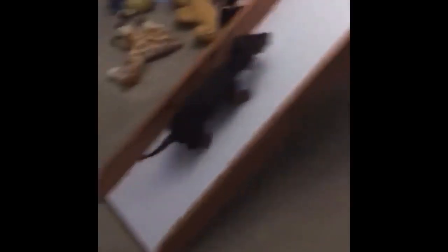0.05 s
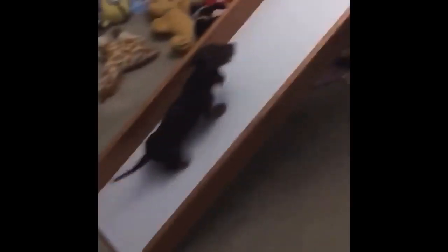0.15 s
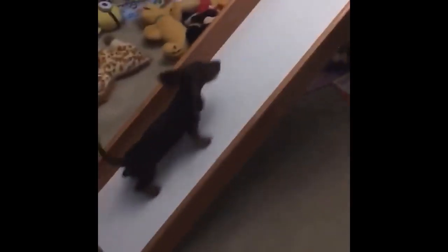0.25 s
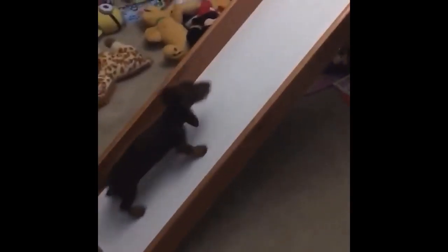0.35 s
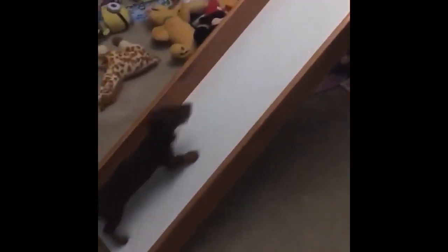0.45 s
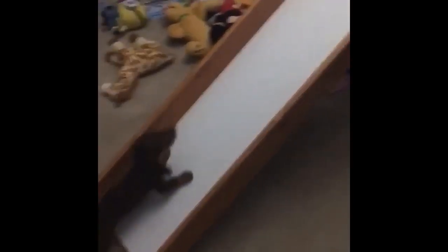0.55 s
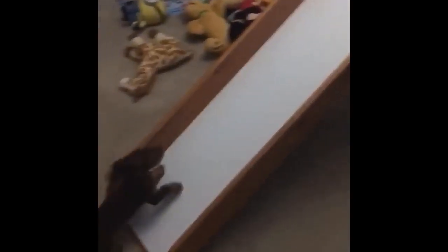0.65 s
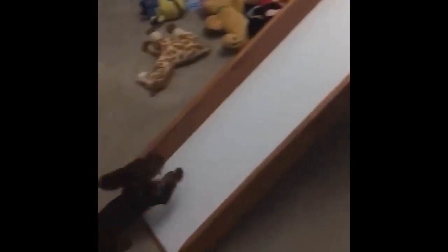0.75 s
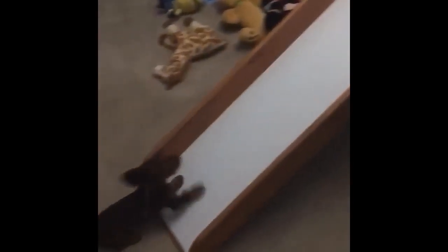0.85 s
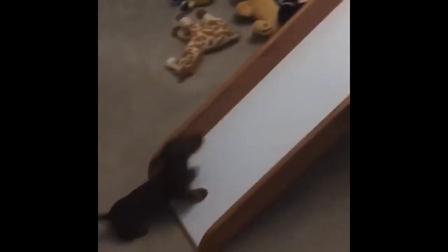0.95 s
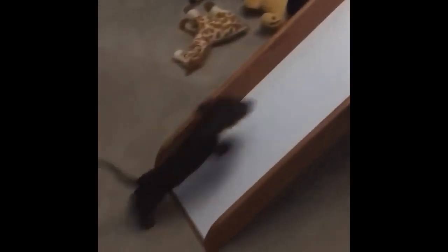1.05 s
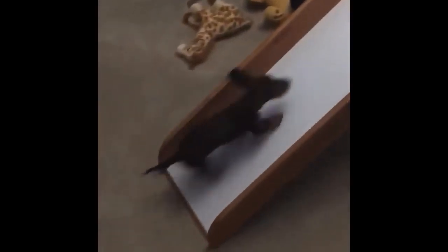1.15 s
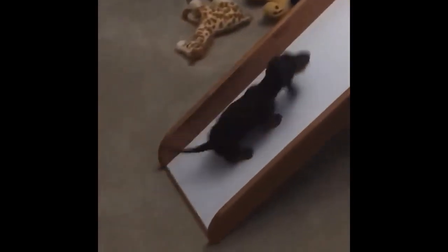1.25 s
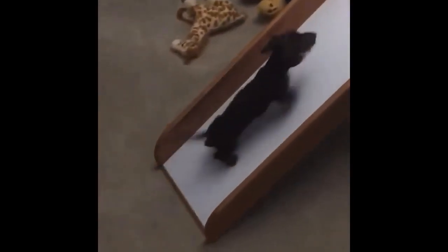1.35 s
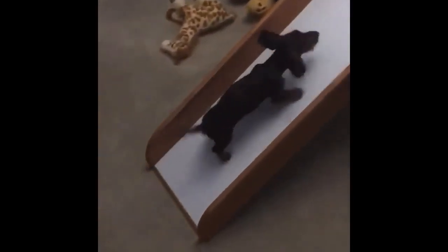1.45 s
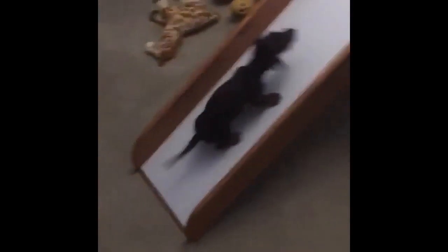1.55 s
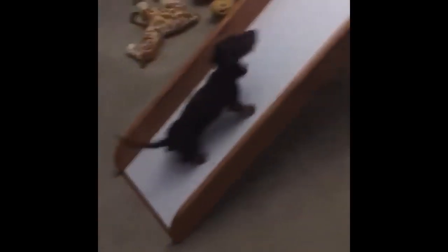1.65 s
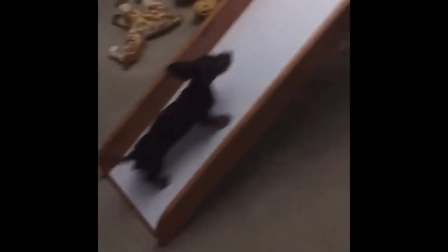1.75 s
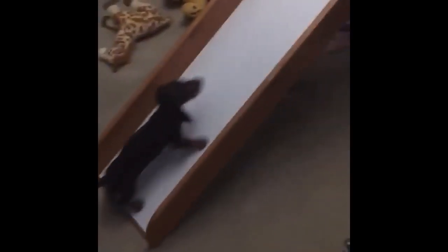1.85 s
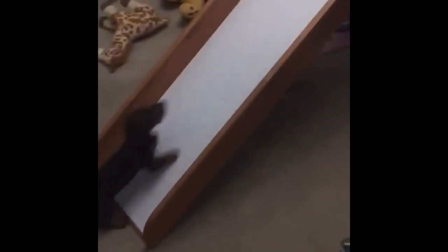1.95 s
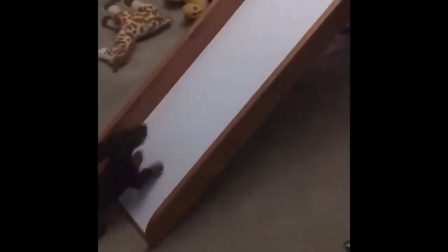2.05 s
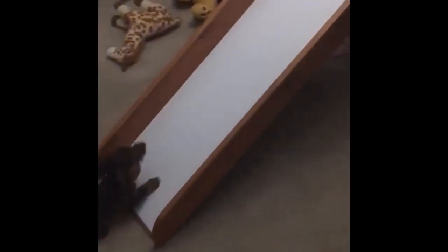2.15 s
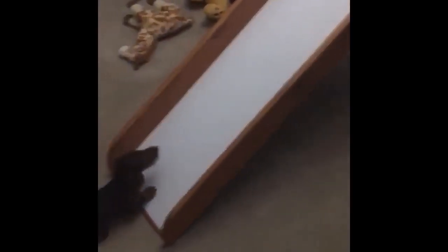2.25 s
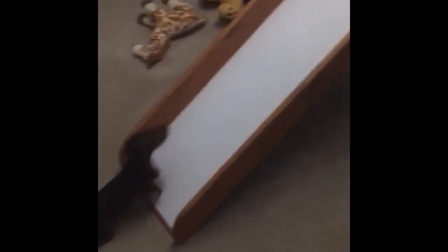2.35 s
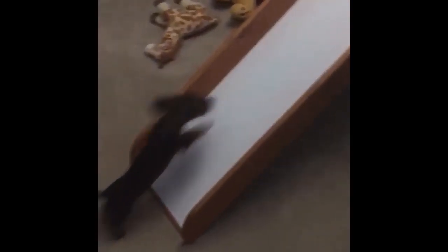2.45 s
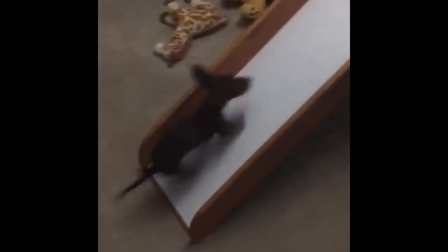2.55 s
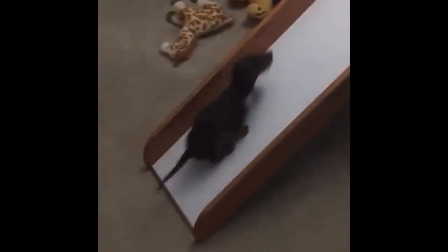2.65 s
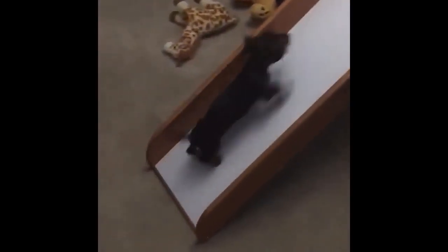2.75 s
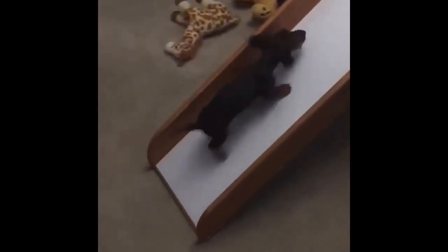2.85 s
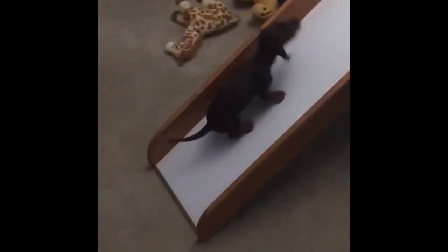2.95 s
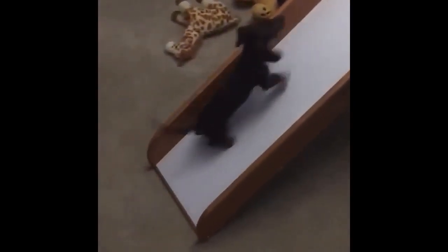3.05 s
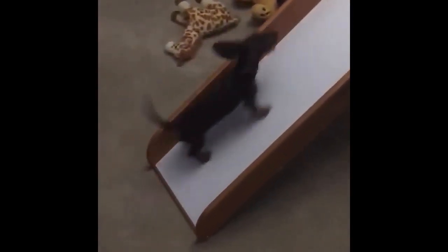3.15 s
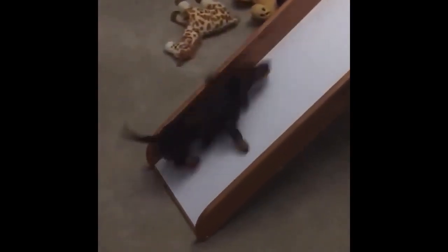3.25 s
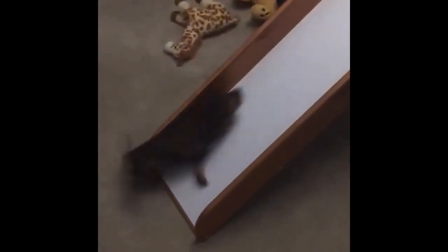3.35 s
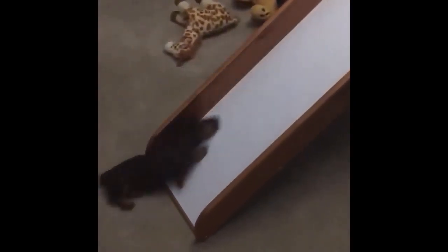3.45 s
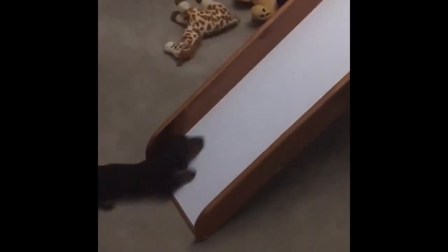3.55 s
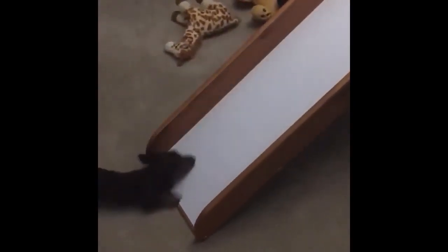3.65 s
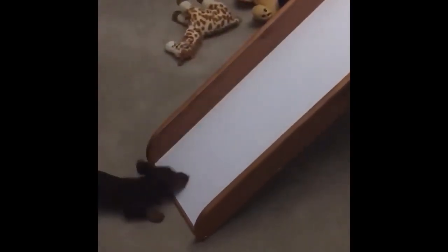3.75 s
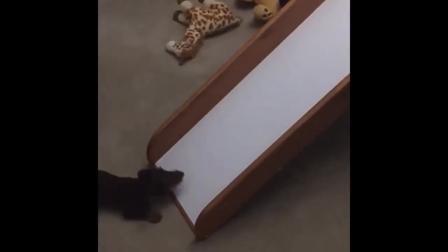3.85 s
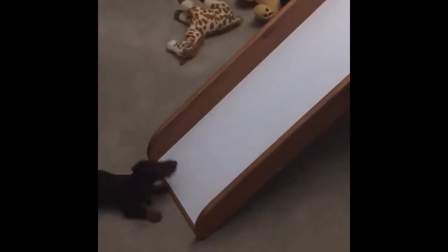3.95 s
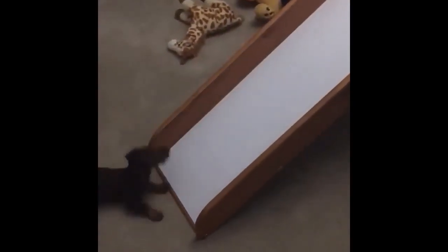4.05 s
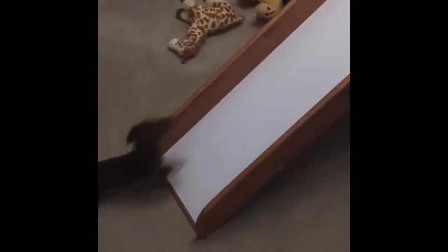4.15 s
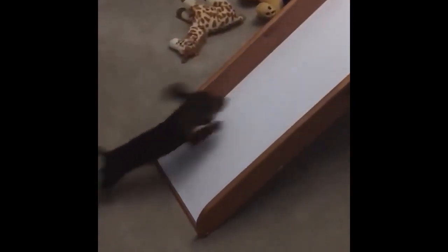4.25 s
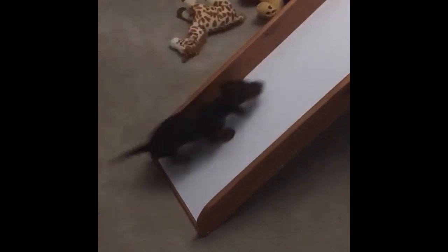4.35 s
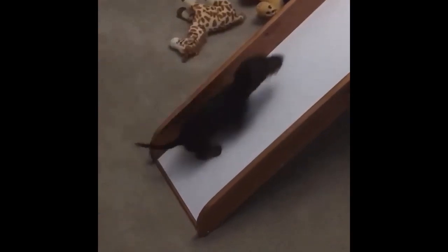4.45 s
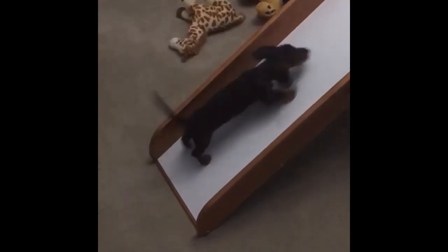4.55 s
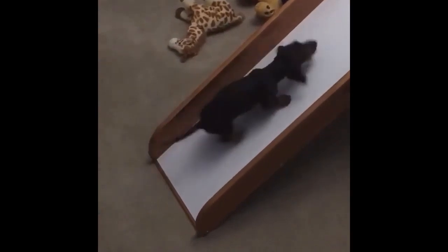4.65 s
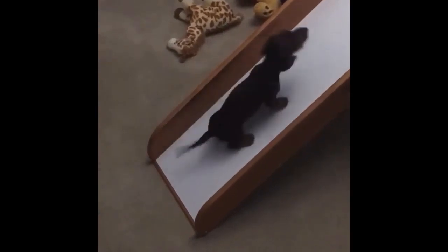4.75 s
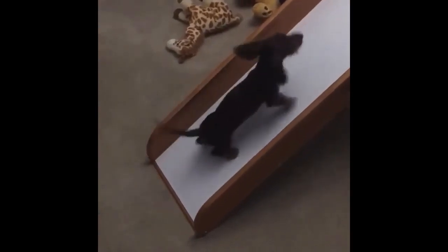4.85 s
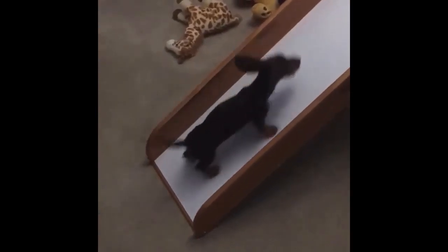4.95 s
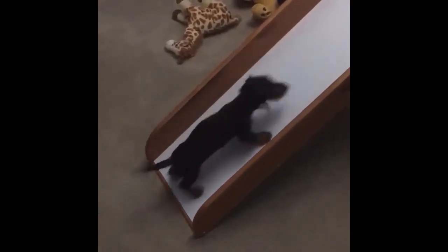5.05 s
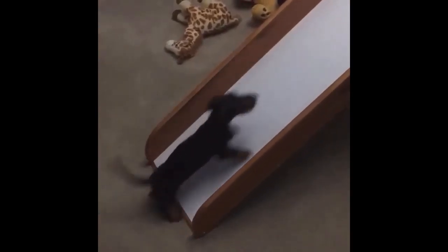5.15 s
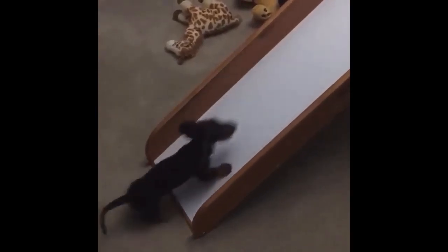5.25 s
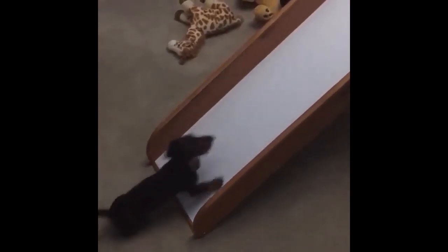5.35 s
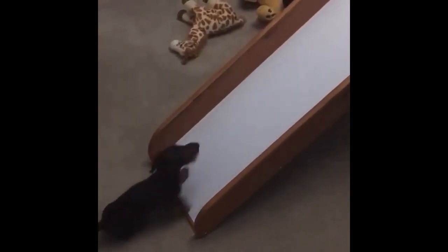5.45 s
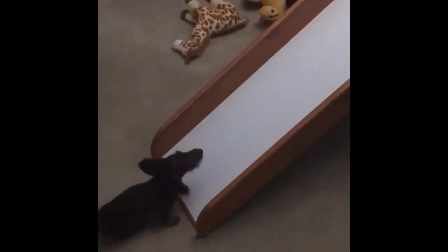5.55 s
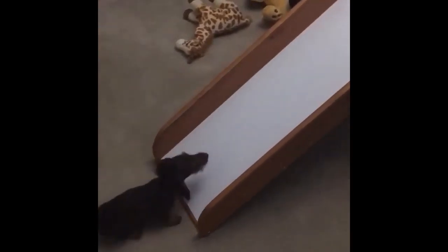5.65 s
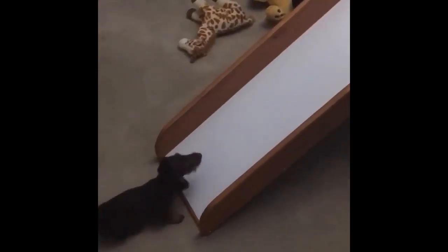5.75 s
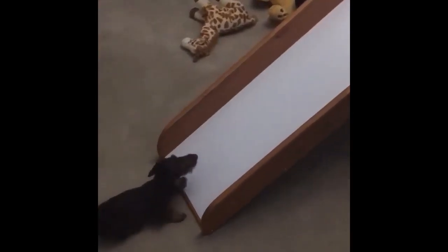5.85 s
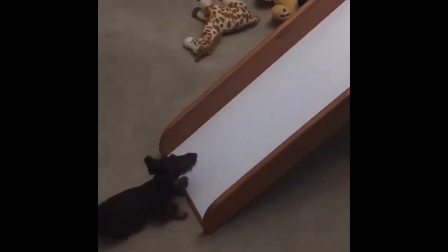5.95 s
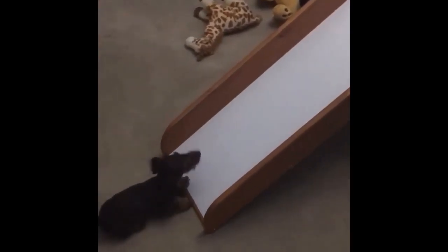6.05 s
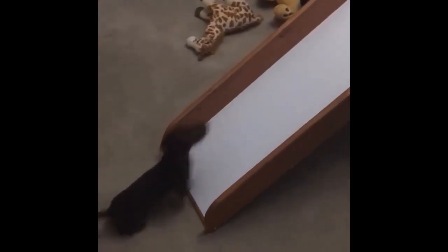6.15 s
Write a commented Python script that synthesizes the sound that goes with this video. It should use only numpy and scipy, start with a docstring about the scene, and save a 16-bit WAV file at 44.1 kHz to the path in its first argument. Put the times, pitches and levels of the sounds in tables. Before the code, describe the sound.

A puppy struggles on a small wooden slide in a quiet carpeted room, heard by one microphone. From 0 to 0.4 s paws thud and claws snap, then gritty fur-and-pad hisses carry it down until about 0.8. A hard landing at 1.03 is followed by a tiny hoarse squeak at 1.1. Footfalls and claw skids cluster from 1.3 to 1.8, then a longer slip hisses to 2.2 and another to 2.5, with a second squeak around 2.45. Busy scrambling at 2.7-3.1 leads to a strong slip and the heaviest hollow thumps at 3.45, fading by 3.9. After a near-quiet gap, paws hammer again at 4.45-4.75, then sliding rubs run from 5 to 5.7. A thin round whine rises at 5.35, cracks into a raspy squeal at 5.7, and falls as a whimper until 6.2. Soft air and faint rapid ticking lie underneath.

```python
"""In a carpeted room a puppy keeps scrambling up a small wooden slide and slipping back down.
Its paws ring the board's modes, claws tick and skid as bursts of grainy noise,
and pads and fur hiss down the smooth face as noise shaped by the force of each slip.
Swept harmonics and rasp make two squeaks of effort, then a long thin whine that falls to a whimper.
Behind it the room air stirs softly and the camera ticks faintly."""
import sys
import numpy as np
from scipy import signal
from scipy.fft import rfft, irfft
from scipy.io import wavfile
from scipy.ndimage import uniform_filter1d

SR = 44100
rng = np.random.default_rng(int(sys.argv[2]) if len(sys.argv) > 2 else 0)


def unload_audio(sound):
    """Save the sound as a 16-bit wav file, at the path given as the first command line argument."""
    columns = np.transpose(np.atleast_2d(sound))
    # keep every value between -1 and 1, then stretch to whole-number steps
    steps = np.round(np.clip(columns, -1, 1) * 32767)
    wavfile.write(sys.argv[1], SR, steps.astype(np.int16))


N = 272972
TIME = np.arange(N) / SR

# hard steps on the board, levels before each layer's gain:
# (time [s], thud of the pad [dB], woody knock [dB], claws [dB])
STEPS = [(.010, -31, -44, -36.5), (0.0938, -32, -40, -29.5), (0.184, -58, -53, -43.5),
         (.236, -42, -42, -72), (.273, -35.5, -44, -40), (.386, -40, -38, -35), (.924, -44.5, -63, -43.5),
         (1.0328, -28.5, -46, -32.5), (1.284, -32, -43.5, -34), (1.333, -40, -54, -37.5),
         (1.391, -32, -45.5, -72), (1.413, -30.5, -48, -40), (1.461, -55, -44.5, -45),
         (1.520, -41, -48, -32), (1.58, -39.5, -50.5, -30.5), (1.7065, -47, -52, -39),
         (1.83, -48, -51, -30.5), (2.286, -37.5, -46, -32.5), (2.53, -48, -61, -55),
         (2.705, -42, -47, -33.5), (2.734, -31.5, -45.5, -34), (2.805, -32.5, -49, -44),
         (2.822, -24.5, -36, -36), (2.8631, -33.5, -59, -36.5), (2.921, -39, -45, -27),
         (2.978, -35.5, -45.5, -30.5), (3.112, -34.5, -38, -42), (3.283, -55, -50.5, -36),
         (3.447, -20.5, -32, -38), (3.476, -24.5, -30, -43), (3.494, -45, -48, -51),
         (3.529, -36, -42.5, -31.5), (3.616, -35, -38, -42.5), (3.879, -48.5, -55, -49),
         (4.097, -49, -54.5, -59.5), (4.116, -49.5, -53.5, -66), (4.302, -61, -59.5, -57.5),
         (4.465, -33, -41, -36.5), (4.587, -24, -33.5, -61), (4.6, -46, -58, -35.5), (4.663, -48, -47, -42),
         (4.695, -30.5, -39.5, -28), (4.732, -32, -44.5, -38.5), (5.001, -54, -58, -34),
         (5.057, -68, -69, -34)]


def undb(db):
    """Turn decibels into an amplitude factor."""
    return 10 ** (np.asarray(db) / 20)


def unit(x):
    """Scale to rms 1."""
    return x / np.sqrt(np.mean(x ** 2) + 1e-18)


def add(out, s, x):
    """Mix a sound in at time s."""
    i = max(int(s * SR), 0)
    out[i:i + len(x)] += x[:max(N - i, 0)]


def log_interp(hz, points):
    """Read a spectrum of (frequency [Hz], level [dB]) points along log frequency."""
    f, db = np.transpose(points)
    return np.interp(np.log(np.maximum(hz, 1)), np.log(f), db)


def colour(x, points, size=4096):
    """Minimum-phase filter of unit power through (frequency [Hz], level [dB]) points."""
    hz = np.arange(size // 2 + 1) * SR / size
    cepstrum = irfft(np.log(undb(log_interp(hz, points))))
    # folding the cepstrum onto positive time makes the filter causal
    cepstrum[1:size // 2] *= 2
    cepstrum[size // 2 + 1:] = 0
    response = irfft(np.exp(rfft(cepstrum)))
    return signal.fftconvolve(x, response / np.linalg.norm(response))[:len(x)]


def walk(rate, n):
    """Random course of rms about 1, in straight lines between rate new values a second."""
    knots = rng.standard_normal(8192)
    return np.sqrt(3 / 2) * np.interp(np.arange(n) / SR * rate, np.arange(len(knots)), knots)


def grains(n, spread_db):
    """Dense tiny clicks of very unequal size, at rms 1."""
    size_db = spread_db * np.minimum(rng.exponential(size=n), 6)
    return unit(rng.standard_normal(n) * undb(size_db))


def paws(thud_gain_db=-5.0, knock_gain_db=-1):
    """Each landing heaves the whole slide, thuds the panel and knocks the wood."""
    heave_gain_db = -16
    out = np.zeros(N)
    for s, thud_db, knock_db in footfalls():
        heave = blow(30, 100, push_s=0.011, spot_db=1.0, clatter_db=-16, clatter_s=0.026)
        thud = blow(100, 425, push_s=0.0023, spot_db=2.5, clatter_db=-13.5, clatter_s=0.052)
        knock = blow(425, 2000, push_s=0.00072, spot_db=5, clatter_db=-0.5, clatter_s=0.025)
        add(out, s, undb(thud_db + heave_gain_db) * heave)
        add(out, s, undb(thud_db + thud_gain_db) * thud)
        add(out, s, undb(knock_db + knock_gain_db) * knock)
    return out


def footfalls(chances_per_s=5, shuffle_db=-2):
    """Hard steps, and soft shuffles at random times in the slips: (time [s], thud [dB], knock [dB])."""
    count = int(chances_per_s * N / SR)
    # one chance falls at random in each equal stretch of time
    place = (np.arange(count) + rng.random(count)) / count
    at = (place * (N - 1)).astype(int)
    db = 20 * np.log10(friction()[at] + 1e-9) + shuffle_db
    shuffles = [(i / SR, d, d - 13) for i, d in zip(at, db) if d > -70]
    return [row[:3] for row in STEPS] + shuffles


def blow(lo, hi, push_s, spot_db, clatter_db, clatter_s, size=1024):
    """The board's modes between lo and hi Hz after one padded push; each spot weights them anew."""
    # modes of the slide: (frequency before detuning [Hz], relative level [dB], t60 [s])
    modes = [(45, 7, 0.28), (55.3, -7, 0.74), (60.7, 13.5, 0.44), (131.4, -4, 0.51), (144.4, -6.5, 0.36),
             (168.4, 3, 0.17), (188, 4.5, 0.15), (217.3, 0, 0.21), (257.4, -6, 0.22), (283.1, -2.5, 0.19),
             (338.1, -9, 0.29), (398, -11.5, 0.38), (443, -5.5, 0.076), (515.3, -3.5, 0.059),
             (598, -4, 0.022), (633, 5, 0.021), (790, -9.5, 0.069), (869, -16.5, 0.19), (1085, -6, 0.044),
             (1190, -4.5, 0.051), (1362, -6.5, 0.037), (1554, -6.5, 0.027), (1752, -15, 0.076)]
    hz, db, t60 = np.transpose([m for m in modes if lo <= m[0] < hi])[:, :, None]
    t = np.arange(int(SR * t60.max())) / SR
    spot, detune, side = rng.standard_normal((3, len(hz), 1))
    height = np.sign(side) * undb(db + spot_db * spot)
    decay = np.exp(-np.log(1000) * t / t60)
    ring = (height * decay * np.sin(2 * np.pi * hz * (1 + 0.0075 * detune) * t)).sum(0)
    # the loose frame adds a short dense clatter around the same resonances
    outline = [(hz.min() / 2, -35), *np.hstack([hz, db]), (2 * hz.max(), -35)]
    clatter = colour(np.resize(rng.standard_normal(size=8192), len(t)), outline)
    x = ring / np.std(ring[:size]) + undb(clatter_db) * clatter * np.exp(-t / clatter_s)
    x = x * (1 - np.exp(-t / push_s))
    # rms 1 over the loudest stretch
    return x / np.sqrt(uniform_filter1d(x ** 2, size).max())


def bumps(sag=0.049):
    """Soft pushes of the body: a few dull cycles that sink in pitch as the weight settles."""
    # body pressing on the board: (mid time [s], pitch there [Hz], level [dB], half length [s])
    pushes = [(.32, 52, -41, 0.029), (0.435, 54.6, -40.5, .02), (1.438, 62.5, -41, 0.024),
              (1.699, 136, -27.5, 0.0054), (1.716, 55.3, -40, .02), (1.776, 67, -44, .015),
              (2.867, 63, -33.5, .03), (3.157, 56.7, -34, 0.0246), (3.518, 59, -25, .02),
              (3.595, 44.7, -39, 0.049), (4.343, 62.3, -56, 0.028), (4.639, 62, -38, 0.035),
              (5.315, 149, -53.5, .02), (5.681, 141.4, -53.5, 0.019)]
    out = np.zeros(N)
    for s, hz, db, width in pushes:
        t = np.arange(-3 * width, 3 * width, 1 / SR)
        phase = 2 * np.pi * np.cumsum(hz * np.exp(-sag * t / width)) / SR
        swell = np.exp(-(t / width) ** 2)
        add(out, s + t[0], undb(db) * np.sqrt(2) * swell * np.sin(phase))
    return out


def claws(gain_db=-2.5, rise_s=0.00078, skid_s=0.013, snap_db=-1.5, snap_s=0.0051):
    """The nails of one paw land with a bright snap, rattle in a cluster of ticks and skid to a stop."""
    # skidding nails: (frequency [Hz], relative level [dB per Hz])
    scratch = [(530, -32), (900, -3.5), (1280, -2), (2960, -10.5), (4150, 5), (4980, -2.5), (5410, 1),
               (7680, -2), (8980, -1), (9880, -9.5), (14000, -15), (16000, -54)]
    skid, snap, t = np.zeros(N), np.zeros(N), np.arange(SR // 5) / SR
    for s, _, _, db in STEPS:
        contact = undb(db + gain_db) * (1 - np.exp(-t / rise_s))
        add(skid, s, contact * np.exp(-t / skid_s))
        add(snap, s, contact * np.exp(-t / snap_s))
    snap_points = [(1500, 8.5), (5000, 11.5), (9000, -0.5), (12000, 2), (15500, -12)]
    bright = colour(snap * grains(N, spread_db=3.5), snap_points)
    return colour(skid * grains(N, spread_db=2.5), scratch) + undb(snap_db) * bright


def slipping(gain_db=0.23, grip_db=1.58, spread_db=2.5, mirror=0.27, path_s=0.00068, sway=0.295):
    """Pads and fur rub down the smooth face with uneven grip."""
    # hiss of the rubbing: (frequency [Hz], relative level [dB per Hz])
    hiss = [(180, -45), (300, -10.5), (326, -25.5), (511, -20.5), (555, -16), (701, -8.5), (946, -10),
            (1190, -3), (2790, -9.5), (4160, 0), (4990, -6), (9090, -7), (10600, -16.5), (15000, -23),
            (16000, -37)]
    grip = undb(gain_db + grip_db * walk(70, N))
    rub = colour(friction() * grip * grains(N, spread_db), hiss)
    # the side rail faintly mirrors the hiss; its path changes as the puppy sways
    lag = path_s * np.exp(sway * walk(9, N))
    return rub + mirror * np.interp(TIME - lag, TIME, rub)


def friction(let_go_db_per_s=406, catch_db_per_s=332):
    """Force of the slipping body: each slip lets go, swells or eases as it runs, and is caught again."""
    # slips down the board: (start [s], length [s], force before gain [dB], swell by the end [dB])
    slips = [(0, 0.064, -47.5, -6.5), (0.288, .15, -46.5, 1.5), (0.469, 0.21, -50, 9),
             (0.737, 0.048, -47, 0.5), (0.956, 0.095, -61, 0), (1.433, 0.23, -51, 4),
             (1.757, 0.42, -45.5, 1), (2.212, 0.27, -54.5, 3), (2.852, 0.21, -46.5, -1),
             (3.147, 0.094, -51.5, 5.5), (3.286, 0.17, -42.5, 0), (3.487, 0.035, -42.5, 0),
             (3.599, 0.25, -50.5, 3), (4.594, 0.19, -52, 1), (4.882, 0.097, -58, 10.5),
             (4.987, 0.4, -49, 4), (5.417, 0.26, -51, 1)]
    out = np.zeros(N)
    for s, length, db, swell_db in slips:
        near = slice(max(int((s - .2) * SR), 0), int((s + length + .3) * SR))
        t = TIME[near] - s
        build_db = let_go_db_per_s * np.minimum(t, 0)
        die_db = -catch_db_per_s * np.maximum(t - length, 0)
        course_db = db + swell_db * np.clip(t / length, 0, 1)
        out[near] = np.maximum(out[near], undb(course_db + build_db + die_db))
    return out


def rumble(gain_db=-12, lurch_db=5.0):
    """The same rubbing makes the slide grumble as the weight shifts."""
    # grumble of the slide: (frequency [Hz], relative level [dB per Hz])
    grumble = [(25, -29), (48, 18.5), (65, 6), (95, -3), (140, 1), (200, -12), (290, -8), (500, -20),
               (900, -44)]
    lurch = undb(gain_db + lurch_db * walk(7.3, N))
    return colour(friction() * rng.standard_normal(N), grumble) * lurch


def laminate(x, hz=4250, width_hz=550, ring_db=-9, direct_db=-1):
    """The thin hard face sings in one narrow band under anything that scrapes it."""
    band = signal.lfilter(*signal.iirpeak(hz, hz / width_hz, fs=SR), x)
    return undb(direct_db) * x + undb(ring_db) * band


def puppy():
    """Two hoarse squeaks of effort, then a round whine that breaks into a thin squeal and a falling whimper."""
    # courses of the voice, before jitter and gain:
    # (time [s], pitch [Hz], fundamental [dB], overtones [dB])
    squeaks = [
        [(1.095, 750, -32, -57), (1.112, 964, -46.5, -48.5), (1.13, 1414, -45, -37.5), (1.15, 1448, -72, -47),
         (1.185, 1210, -74, -66)],
        [(2.41, 1415, -53, -78), (2.465, 956, -51.5, -85), (2.49, 987, -58, -81), (2.51, 1453, -46, -45),
         (2.53, 1580, -66, -55), (2.555, 1560, -77, -72)],
    ]  # one such course for each squeak
    whine = [(5.345, 791, -75, -48), (5.359, 856, -46, -59), (5.403, 1087, -47, -57),
             (5.445, 1228, -34.5, -51), (5.475, 1246, -48, -49), (5.527, 1208, -29, -57),
             (5.559, 1155, -41, -51), (5.575, 1139, -30, -42.5), (5.585, 1144, -56, -54),
             (5.645, 1120, -45.5, -46), (5.677, 1310, -56, -47.5), (5.71, 1304, -49, -60)]
    squeal = [(5.715, 1513, -61, -50.5), (5.775, 1546, -54.5, -43), (5.863, 1428, -51.5, -41.5),
              (5.917, 1387, -61.5, -84), (5.963, 1187, -60, -83), (5.973, 1193, -74, -91),
              (5.99, 1151, -78, -68)]
    whimper = [(6.005, 1160, -86, -79), (6.023, 1074, -54.5, -57), (6.065, 1011, -62, -55),
               (6.107, 889, -63, -61), (6.167, 827, -51, -60.5), (6.19, 778, -63, -67)]
    out = np.zeros(N)
    for rows in squeaks:
        add(out, rows[0][0], call(rows, held_rough=0.56, tilt_db=7, gain_db=0))
    add(out, whine[0][0], call(whine, held_rough=0.075, tilt_db=-9.5, gain_db=0))
    add(out, squeal[0][0], call(squeal, held_rough=0.13, tilt_db=0.0, gain_db=-0.5))
    add(out, whimper[0][0], call(whimper, held_rough=.02, tilt_db=2, gain_db=-2.0))
    return out


def call(rows, held_rough, tilt_db, gain_db, jitter=0.064, shimmer_db=5, waver_db=4, count=10):
    """A thin whistling voice; fast glides shake it and turn it to rasp, the muzzle picks out overtones."""
    # resonances of throat and muzzle: (frequency [Hz], relative level [dB])
    muzzle = [(1700, -16), (2400, -3), (3000, -3), (3600, 5), (4350, 8.5), (5200, 0), (6050, 6),
              (6800, -16), (7500, -8), (8500, -23), (14000, -37)]
    break_oct_per_s = 25.8  # a glide this fast breaks the voice into pure rasp
    s, *columns = np.transpose(rows)
    t = np.arange(s[0], s[-1], 1 / SR)
    hz, low_db, high_db = (np.interp(t, s, c) for c in columns)
    glide = uniform_filter1d(np.abs(np.gradient(np.log2(hz))) * SR, size=900)
    rough = np.clip(held_rough + glide / break_oct_per_s, 0, 1)
    hz = hz * (1 + jitter * rough * (1 + 2 * rough ** 2) * walk(600, len(t)))
    phase = 2 * np.pi * np.cumsum(hz) / SR

    k = np.arange(2, count + 1)[:, None]
    # tilt per octave: more strain, brighter
    weights = undb(log_interp(k * hz, muzzle) + tilt_db * np.log2(k))
    # as the head moves, each overtone swells and fades on its own
    waver = undb(waver_db * np.array([walk(59.7, len(t)) for _ in k]))
    overtones = (weights * waver * np.sin(k * phase)).sum(0)
    overtones = np.sqrt(2) * overtones / np.linalg.norm(weights, axis=0)

    rasp = colour(rng.standard_normal(len(t)), [(400, -25), (1200, -5), *muzzle])
    clear_part, rough_part = np.sqrt(1 - rough ** 3), rough ** (3 / 2)
    upper = clear_part * overtones + rough_part * rasp
    fundamental = np.sqrt(2) * np.sin(phase) * (clear_part + rough_part * walk(1400, len(t)))
    voice = undb(low_db) * fundamental + undb(high_db) * upper
    fade = np.clip(np.minimum(t - t[0], t[-1] - t) / 0.011, 0, 1)
    shimmer = shimmer_db * np.minimum(rough, .5) * walk(300, len(t))
    return voice * fade * undb(gain_db + shimmer)


def room(x, wet_db, low_t60_s=0.33, treble_t60_s=0.16):
    """Dense reflections of a small carpeted room; the treble dies first."""
    t = np.arange(SR // 2) / SR
    noise = rng.standard_normal(len(t))
    low = signal.sosfilt(signal.butter(1, 3500, fs=SR, output="sos"), noise)
    tail = low * undb(-60 * t / low_t60_s) + (noise - low) * undb(-60 * t / treble_t60_s)
    # silent for 3.9 ms, then fades in over as long again
    tail = tail * np.clip(t / 0.0039 - 1, 0, 1)
    return x + undb(wet_db) * signal.fftconvolve(x, tail / np.linalg.norm(tail))[:N]


def background(quiet_db=-56, air_db=-0.5, stir_db=1.5, tick_db=-61, tick_s=0.005):
    """Softly stirring room air, and the camera's faint high tick twenty times a second."""
    # air of the room: (frequency [Hz], relative level [dB per Hz])
    quiet = [(25, -6), (45, -7.5), (65, 1), (95, -11), (150, -16.5), (300, -22.5), (700, -31), (1400, -31),
             (2500, -40), (4200, -39), (8500, -41.5), (11000, -46), (15000, -51)]
    stir = undb(quiet_db + air_db + stir_db * walk(11, N))
    air = colour(rng.standard_normal(N), quiet) * stir
    since = (TIME - .0385) % .05  # seconds since the last tick
    tick_points = [(3500, -36), (5200, -7), (7400, -7), (8300, -32)]
    tick = colour(rng.standard_normal(N) * np.exp(-since / tick_s), tick_points)
    return air + undb(tick_db) * tick


def scene():
    """Board, face and voice reach one microphone through the room."""
    board = room(paws() + bumps() + rumble(), wet_db=-8.5)
    face = room(laminate(claws() + slipping()), wet_db=-6)
    mono = board + face + room(puppy(), wet_db=-7.5) + background()
    return np.array([mono, mono])


def record(dry, top_hz=15800):
    """One microphone on both channels, with the top cut off steeply."""
    return signal.sosfilt(signal.ellip(10, .2, 70, top_hz, fs=SR, output="sos"), dry)


dry = scene()
out = record(dry)
unload_audio(out)
```